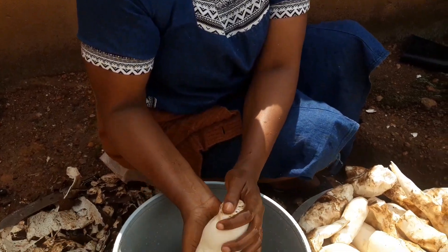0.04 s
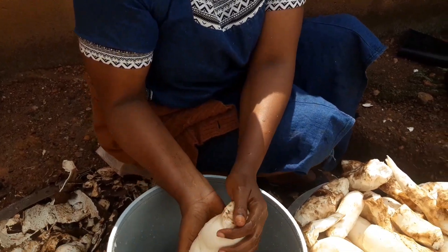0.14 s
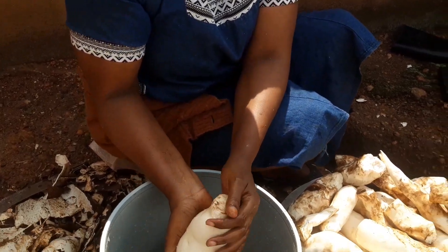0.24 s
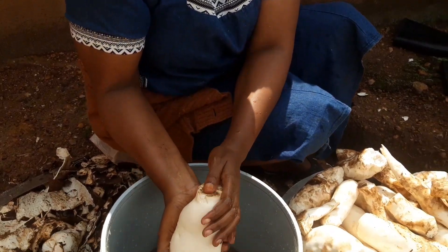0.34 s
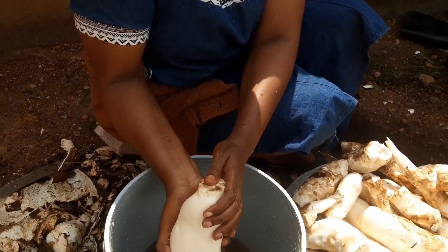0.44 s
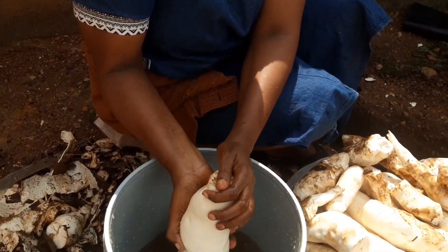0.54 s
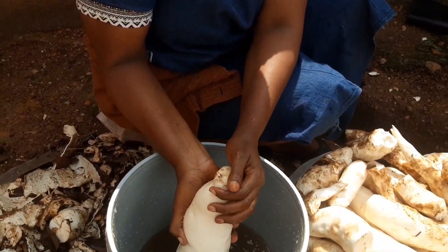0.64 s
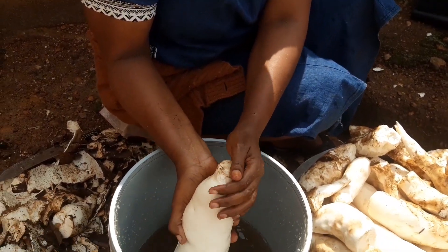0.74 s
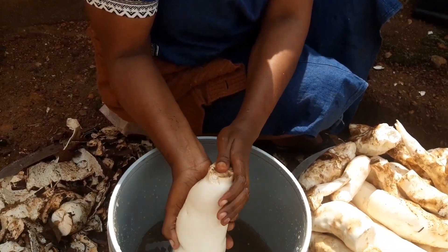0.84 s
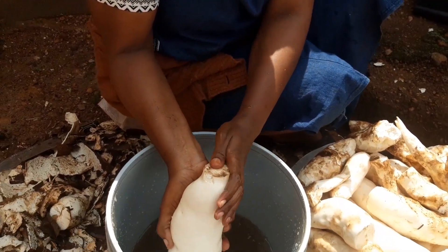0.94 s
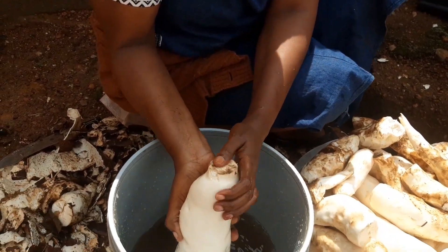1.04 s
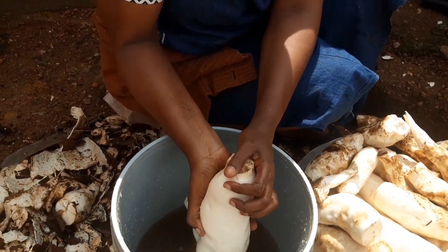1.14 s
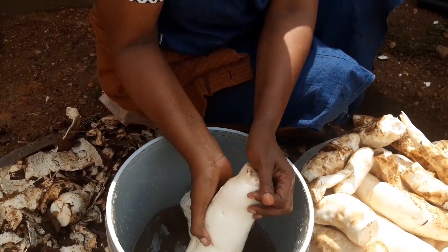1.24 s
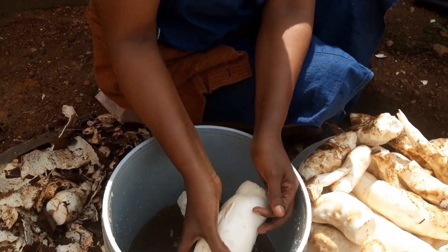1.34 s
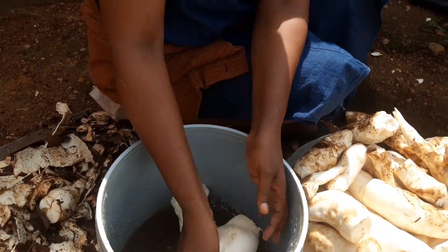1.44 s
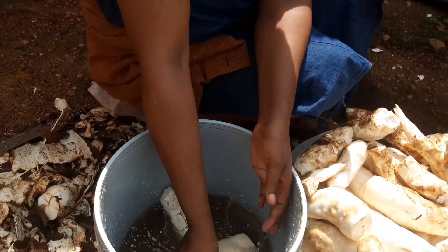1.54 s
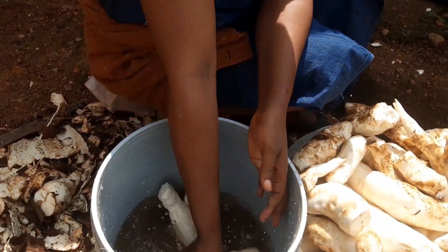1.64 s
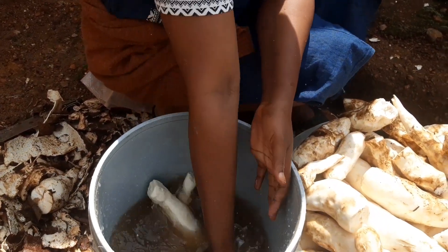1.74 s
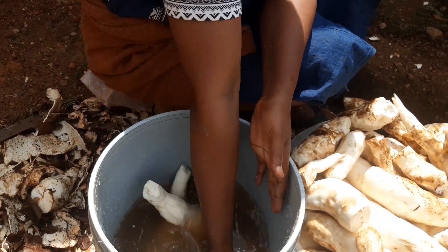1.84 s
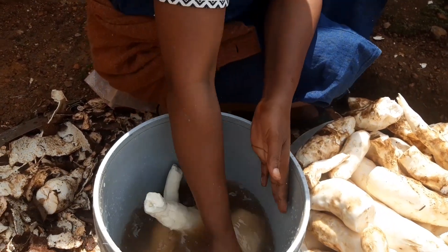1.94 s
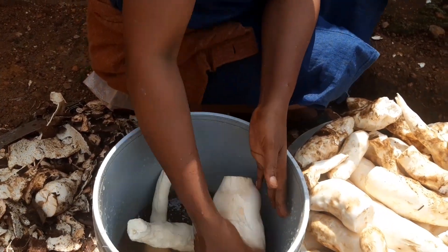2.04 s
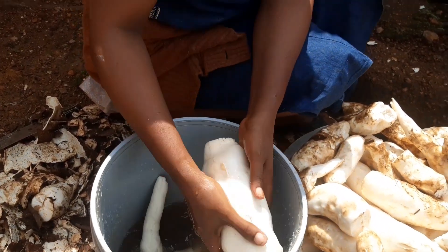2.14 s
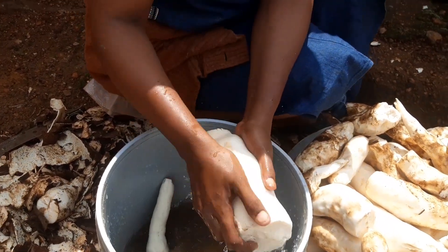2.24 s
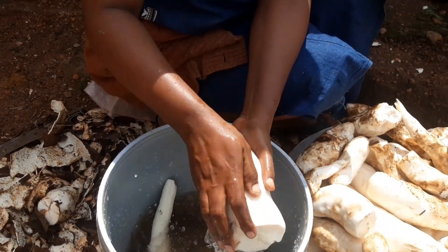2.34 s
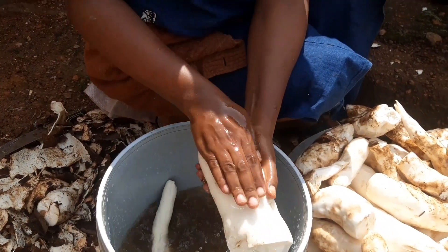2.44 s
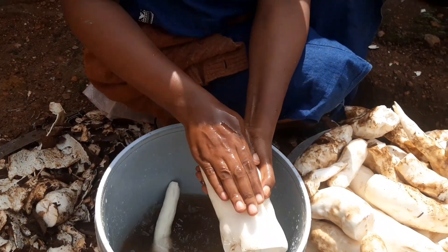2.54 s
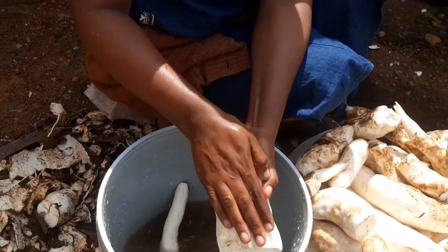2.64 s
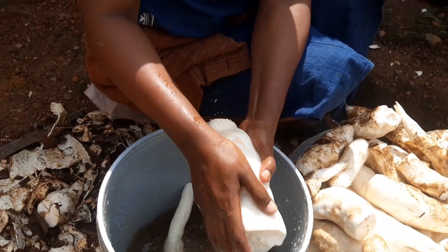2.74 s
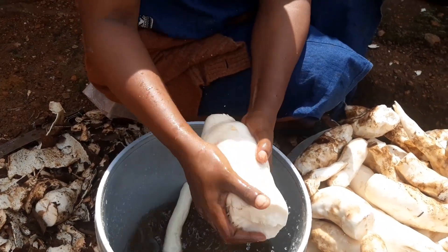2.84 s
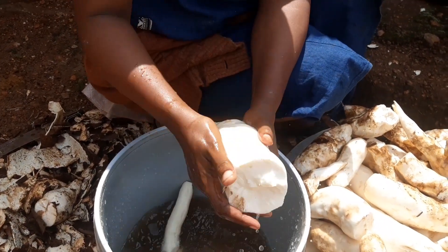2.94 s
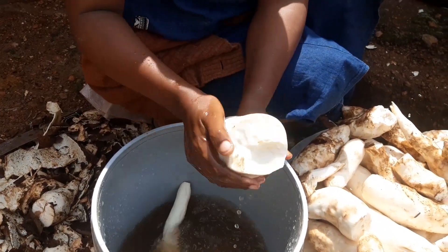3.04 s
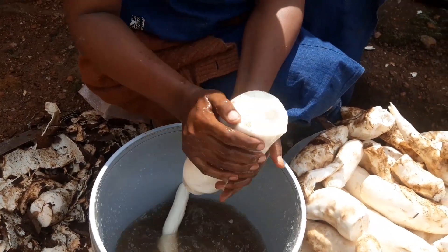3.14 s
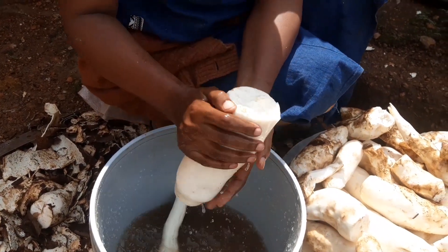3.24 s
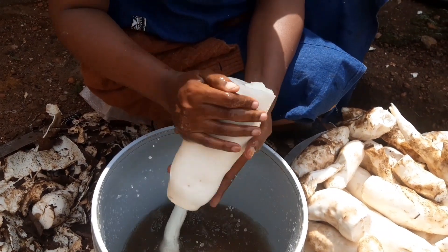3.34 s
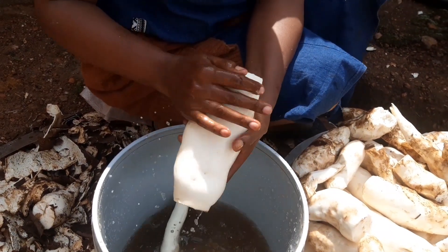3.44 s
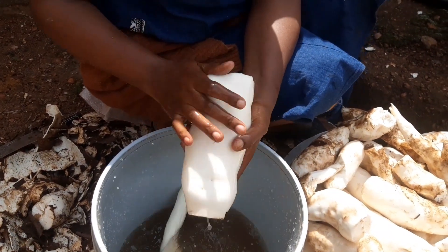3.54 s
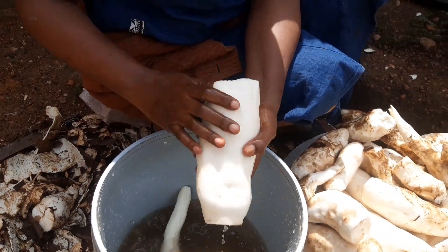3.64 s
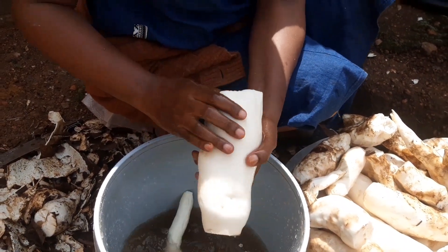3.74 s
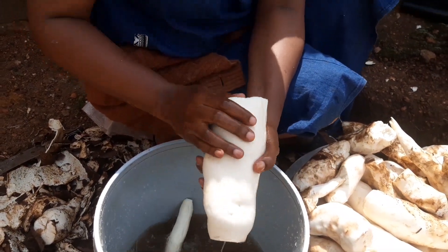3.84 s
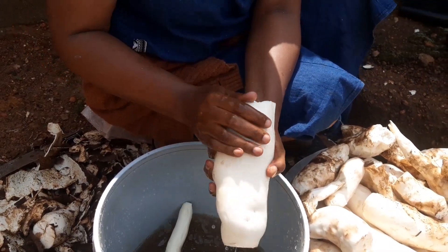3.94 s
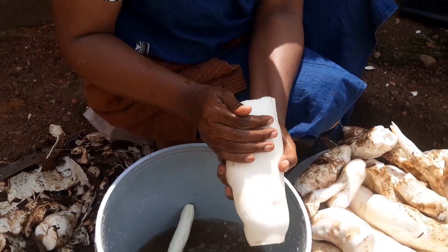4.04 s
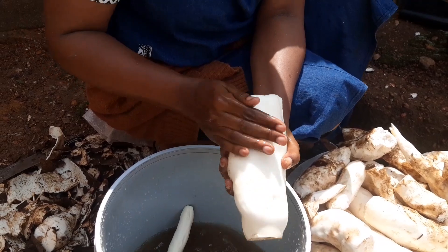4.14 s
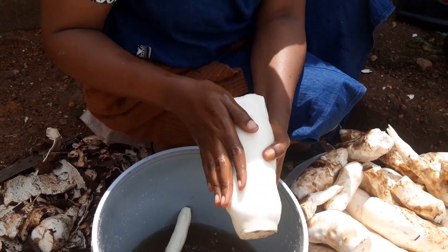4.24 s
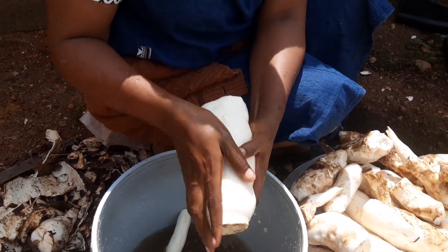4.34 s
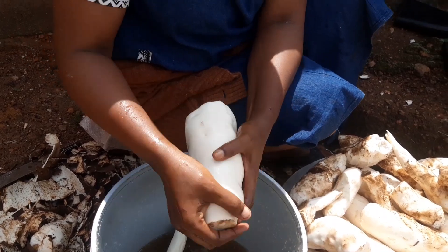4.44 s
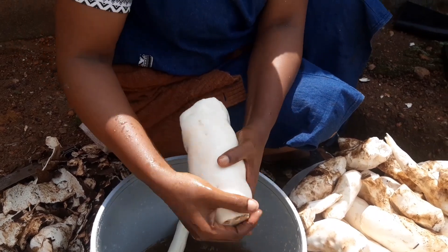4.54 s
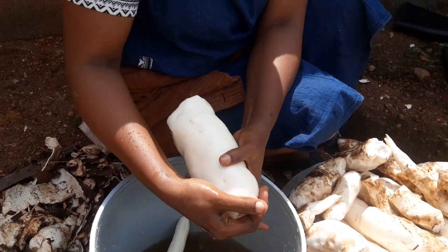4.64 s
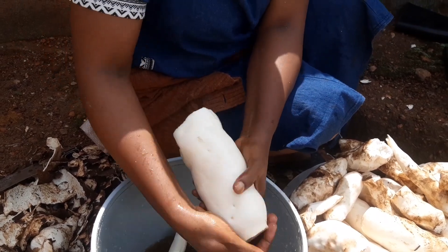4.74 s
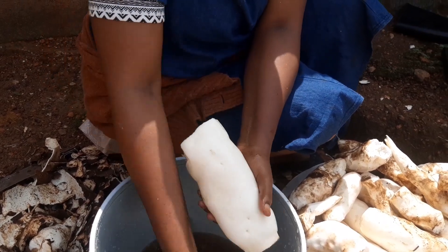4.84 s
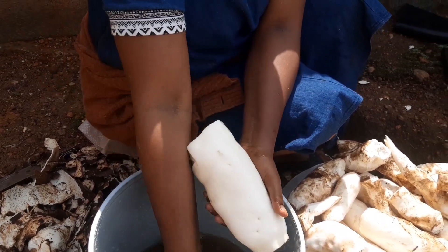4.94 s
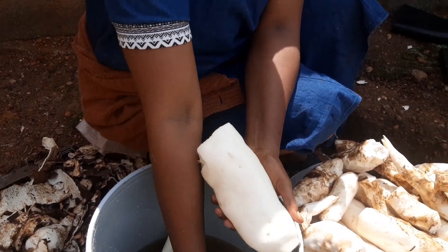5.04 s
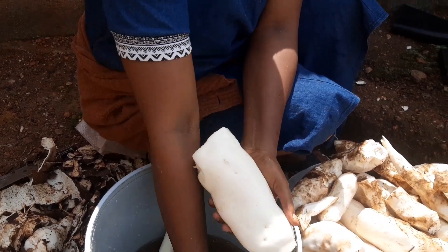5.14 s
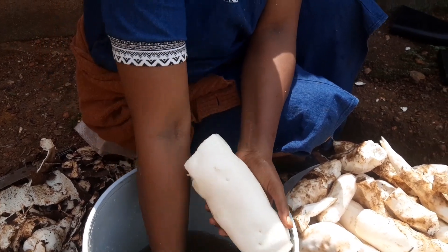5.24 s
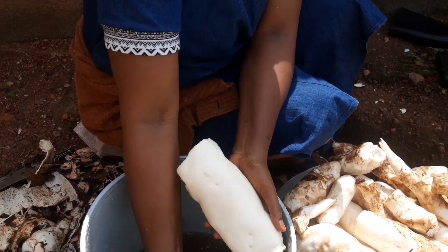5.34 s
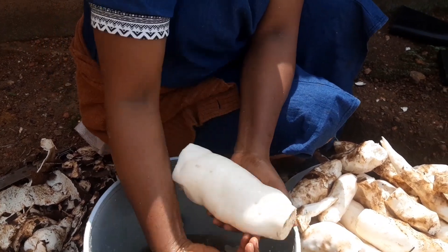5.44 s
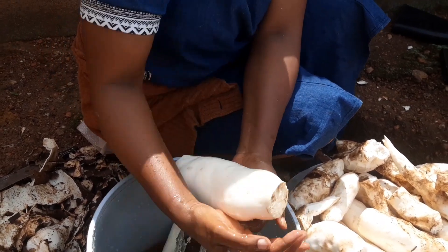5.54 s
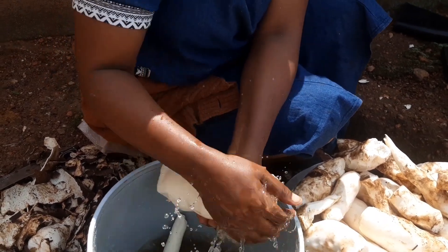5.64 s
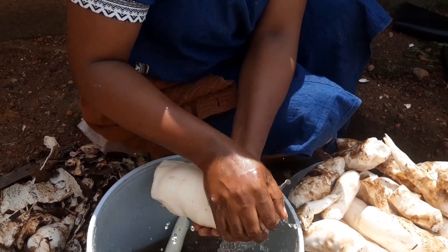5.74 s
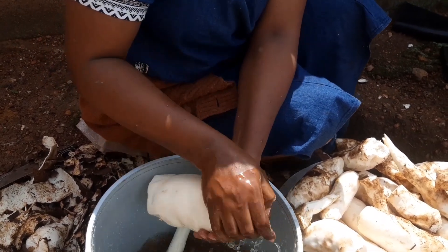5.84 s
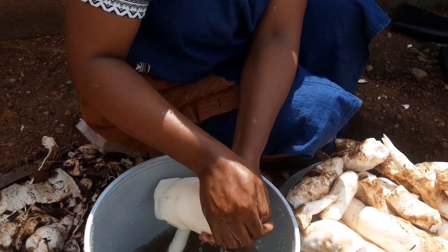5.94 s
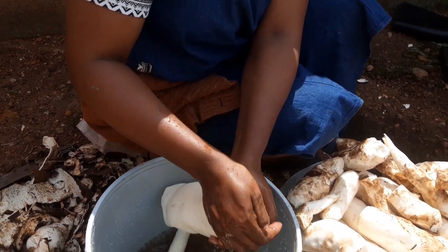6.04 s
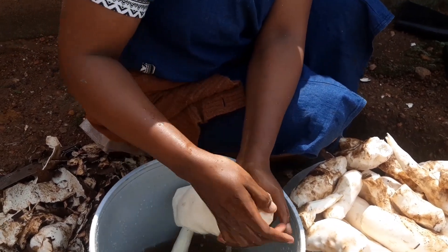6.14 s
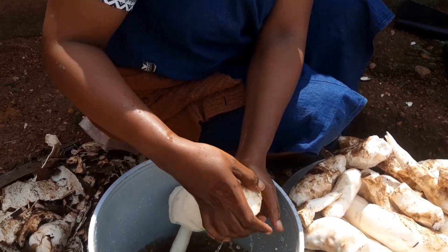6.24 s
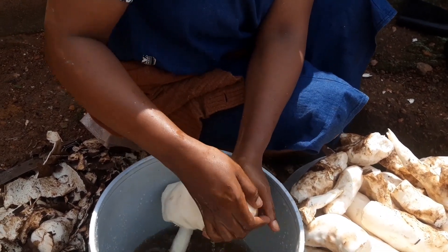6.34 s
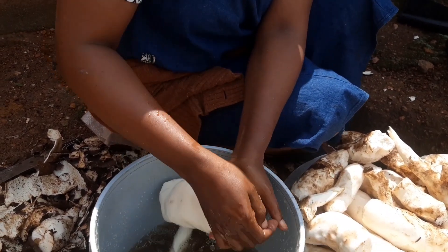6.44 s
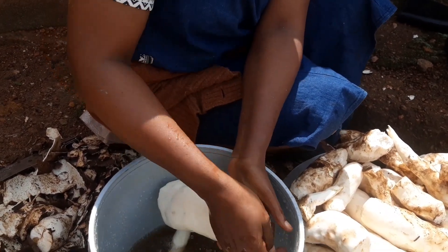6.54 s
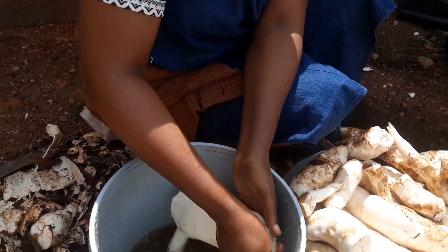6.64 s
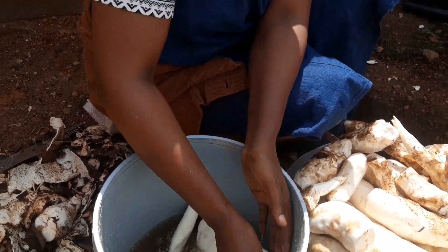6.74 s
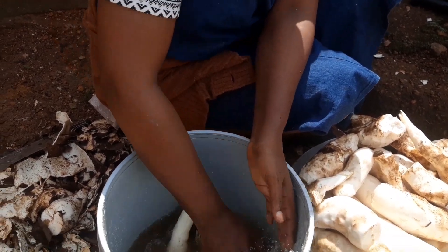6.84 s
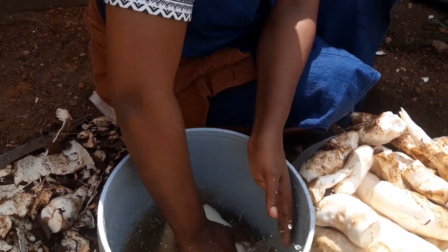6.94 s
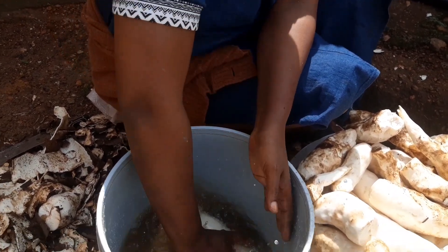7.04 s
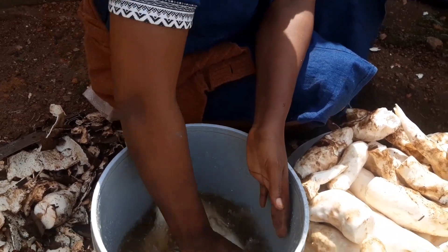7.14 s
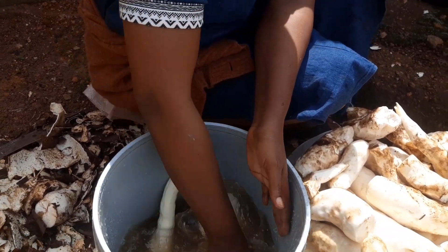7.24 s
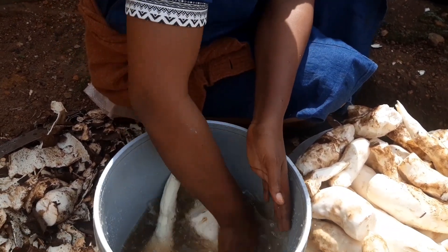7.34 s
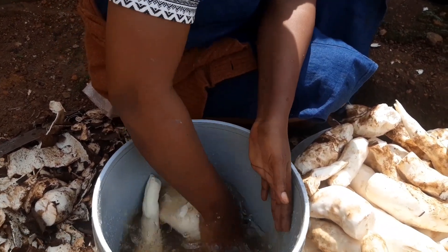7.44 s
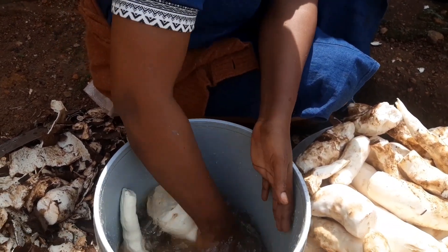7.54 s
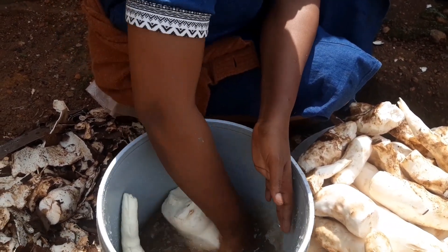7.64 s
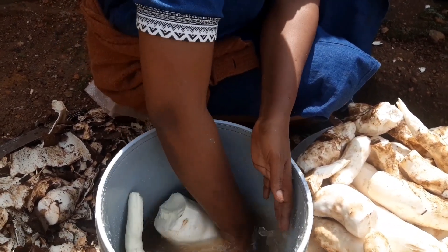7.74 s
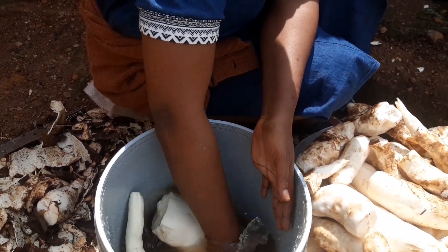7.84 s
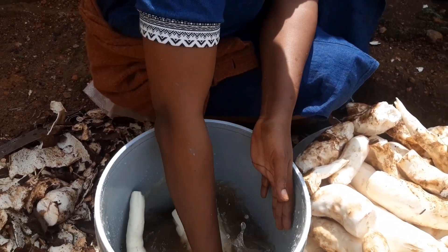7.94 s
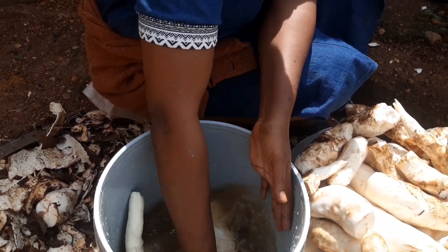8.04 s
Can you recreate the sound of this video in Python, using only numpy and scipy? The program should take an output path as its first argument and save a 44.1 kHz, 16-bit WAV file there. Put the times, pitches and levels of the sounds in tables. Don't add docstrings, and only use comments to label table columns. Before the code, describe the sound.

Close, dry stereo in a quiet yard, the right side crisp and the left duller. Hands wash peeled roots in a plastic bucket. For the first 1.3 seconds there is little water: faint drips, a dull low knock near 0.4, soft hollow rubbing and small dry clicks around 0.9. At 1.4-1.5 a sharp splash opens the dunking; rounded gurgles and plops swell around 2.0-2.3, with bright drops until 2.8. From 3 to 4.8 it is nearly still, with rubbing, sparse ticks and a faint wet squeak around 4.0-4.4. Water stirs again at about 4.9, and scooped splashes, bubbles and spray crowd 5.3-6.0. After a short lull, the strongest plunge hits at 6.8 with a hollow bucket thump. Busy sloshing follows, surging around 7.4-7.6 with deeper bucket hum, and another surge ends it near 8.

```python
import sys
import numpy as np
from scipy import signal
from scipy.fft import rfft, irfft, next_fast_len
from scipy.io import wavfile

SR = 44100
rng = np.random.default_rng(int(sys.argv[2]) if len(sys.argv) > 2 else 0)


def file_out(sig):
    cols = np.atleast_2d(sig).T
    lim = np.clip(cols, -1, 1)
    pcm = np.round(lim * 32767).astype(np.int16)
    wavfile.write(sys.argv[1], SR, pcm)


def magnitude_from_level(level_db):
    exponent = np.asarray(level_db, float) / 20
    return 10 ** exponent


N = 356769

# (peak time [s], slosh level [dB], flung water level [dB], fade by 10 dB [s])
SURGES = [(0.0, -62.5, -101, 0.11), (0.125, -66, -60, 0.045), (0.4, -59, -67.5, 0.23),
          (0.91, -58, -72, 0.076), (1.15, -62.5, -71.5, 0.64), (1.43, -43.5, -60, 0.13),
          (1.51, -41, -53.5, 0.1), (1.66, -73, -50, 0.056), (1.81, -45, -65.5, 0.078),
          (2.09, -38, -49.5, 0.18), (2.24, -43.5, -46, 0.05), (2.47, -50.5, -51.5, 0.13),
          (2.65, -50.5, -56, 0.15), (2.99, -75, -67.5, 0.24), (3.3, -71, -73, 0.95),
          (3.91, -71.5, -70, 0.12), (4.2, -70, -99, 0.67), (4.59, -84.5, -66, 0.17),
          (4.93, -52.5, -61.5, 0.089), (5.33, -42.5, -56, 0.24), (5.58, -43.5, -44, 0.16),
          (5.78, -45.5, -46, 0.17), (5.98, -52, -48.5, 0.062), (6.32, -61, -63, 0.079),
          (6.5, -74, -69.5, 0.48), (6.83, -33.5, -41, 0.098), (7.05, -52.5, -59, 0.55),
          (7.38, -41.5, -52.5, 0.25), (7.6, -37, -47.5, 0.14), (8.08, -44.5, -51.5, 0.4)]
# (time [s], peak level [dB], pitch
# [Hz], length [s])
BUBBLES = [(1.419, -37, 757, 0.035), (1.489, -33.5, 634, .0076), (2.041, -22, 1060, 0.016),
           (2.079, -20, 865, 0.0085), (2.098, -21.5, 590, 0.0064), (2.113, -26.5, 592, 0.027),
           (2.178, -22.5, 816, 0.0054), (2.197, -24.5, 930, .0076), (2.262, -29, 1050, 0.0062),
           (2.663, -37.5, 1510, 0.012), (5.298, -26, 1060, 0.0031), (5.325, -31, 829, 0.068),
           (5.374, -31, 972, .02), (5.43, -29, 787, 0.01), (5.4762, -20.5, 990, 0.011),
           (5.551, -22, 1266, 0.002), (5.601, -22, 1230, .0015), (5.802, -38, 880, 0.0033),
           (5.924, -28, 812, 0.027), (6.008, -27.5, 630, .0056), (6.827, -21, 1420, 0.0039),
           (6.8285, -14.5, 946, 0.002), (6.844, -18, 617, 0.025), (7.049, -22, 788, 0.00245),
           (7.307, -28, 1200, .0038), (7.39, -27.5, 870, 0.0028), (7.426, -28.5, 1006, 0.0037),
           (7.535, -16, 965, 0.0048), (8.089, -17, 725, 0.00134), (8.0228, -16, 1085, 0.0026),
           (0.01, -50, 666, 0.081), (0.704, -41, 654, 0.0024), (0.936, -40.5, 603, 0.0049),
         (1.374, -32, 1030, 0.0034), (1.594, -33.5, 697, 0.013), (1.759, -37, 777, 0.0094),
         (1.792, -36, 1127, 0.033), (1.812, -39, 1213, 0.029), (2.024, -31, 725, 0.016),
         (2.296, -30, 1080, 0.0063), (2.445, -42, 918, 0.052), (2.729, -38.5, 1255, .017),
         (2.739, -34, 727, 0.0072), (3.93, -41, 993, 0.025), (4.046, -48, 900, 0.0067),
         (4.124, -62, 1400, 0.012), (7.734, -33, 452, 0.035), (5.615, -31.5, 773, 0.042),
         (5.918, -29.5, 503, 0.03), (6.294, -32, 774, 0.0266), (6.337, -36.5, 1000, 0.0084),
         (6.594, -38, 900, 0.012), (6.758, -32.5, 1110, 0.0057), (7.076, -30, 690, 0.0022),
         (7.221, -28.5, 780, 0.01), (7.503, -26, 408, 0.055), (7.847, -29, 1070, 0.0038),
         (1.956, -45.5, 778, 0.025), (7.996, -27, 696, 0.014)]
# (frequency [Hz], gain [dB])
BUBBLE_AIR = [(430, 2), (570, 1), (770, 2.5), (900, -0.5), (1120, 1), (1400, 0.5), (1750, 5)]
# (time [s], peak level [dB], pitch [Hz])
PLOPS = [(1.578, -42.5, 714), (1.627, -41, 736), (1.826, -33, 1400), (1.838, -38, 1580), (1.852, -33, 1160),
         (2.03, -28, 1350), (2.058, -26, 1400), (2.07, -26, 1200), (2.007, -30.5, 760), (2.248, -38, 707),
         (2.331, -38, 686), (2.37, -42, 764), (2.426, -40, 678), (2.461, -30, 774), (2.4415, -31, 1050),
         (2.492, -34, 1000), (2.637, -34, 970), (2.701, -37, 1260), (5.114, -43, 778), (5.31, -31, 800),
         (5.198, -40, 840), (5.225, -37, 760), (5.27, -34, 1100), (5.533, -31, 1360), (5.58, -34, 1026),
         (5.659, -26, 687), (5.724, -31, 851), (5.789, -30, 970), (5.833, -27, 788), (5.862, -28.5, 1040),
         (5.892, -34, 530), (5.935, -20.5, 802), (6.605, -36, 1010), (6.229, -52, 1100),
         (6.745, -29.5, 1104), (6.784, -29, 950), (6.897, -28, 728), (6.933, -31, 703), (6.974, -38, 730),
         (7.014, -30.5, 874), (7.038, -26, 784), (7.136, -36, 787), (7.164, -37, 890), (7.247, -40, 875),
         (7.29, -31, 1300), (7.361, -42, 780), (7.45, -18.5, 823), (7.606, -28, 800), (7.634, -26, 1250),
         (7.76, -31, 470), (7.798, -38, 735), (7.82, -30.5, 732), (7.944, -34.5, 500), (7.951, -34.5, 1300),
         (7.987, -35, 785)]
# (time [s], peak level [dB], pitch [Hz])
DROPS = [(0.122, -51, 2050), (2.572, -46.5, 2800), (1.358, -49, 2350), (1.485, -27.5, 2770),
         (1.6, -38, 2780), (6.33, -46.5, 2650), (2.011, -38.5, 2870), (2.442, -39.5, 2730),
         (2.609, -42, 2380), (3.08, -56, 2330), (3.165, -53, 2530), (7.289, -36, 4350), (7.229, -42, 4100),
         (4.305, -64, 2800), (4.66, -53.5, 2470), (7.245, -42, 1610), (7.318, -42.5, 3180),
         (2.585, -45, 2300), (2.635, -49, 2820), (1.625, -46, 2900), (1.675, -42, 2260), (5.2, -53, 4250),
         (5.235, -50.5, 3600), (4.94, -48, 2530), (5.055, -56.5, 2450), (3.278, -48, 2060),
         (3.79, -50.5, 2410), (4.008, -48, 2840), (4.547, -49, 1560), (6.213, -56, 4800),
         (6.229, -55, 4250), (6.33, -50, 4200), (6.512, -55, 2300), (6.597, -55, 4450), (6.078, -48, 2100),
         (5.551, -32, 2800), (5.658, -31, 2170), (5.814, -30, 3330), (5.928, -31.5, 1870),
         (6.415, -50, 2900), (6.52, -55, 3100), (6.098, -49, 2580), (6.123, -44, 2520), (6.4, -53.5, 2300),
         (6.802, -29.5, 2130), (6.83, -20.5, 2200), (5.92, -34, 1670), (6.932, -36, 2790),
         (7.039, -38.5, 2720), (7.29, -36, 3050), (7.353, -40, 3300), (7.597, -38.5, 2200),
         (8.086, -29.5, 2850)]
# (time [s], peak level [dB], pitch [Hz])
MORE_DROPS = [(1.422, -34, 2740), (1.5244, -30, 1880), (1.6606, -44, 2230), (1.8543, -36.5, 2360),
              (1.937, -47, 4450), (2.1375, -34, 2040), (2.165, -29.5, 2040), (2.426, -33.5, 2640),
              (2.4912, -45, 2030), (2.6934, -33.5, 2530), (2.7295, -35, 2730), (2.822, -43, 2220),
              (3.7524, -49, 2350), (3.886, -52, 2650), (3.9115, -55, 2380), (3.931, -48, 2240),
              (3.9744, -52, 2520), (4.4418, -52.5, 2820), (5.272, -35.5, 3100), (5.3554, -31.5, 2200),
              (5.4277, -28, 2910), (5.4826, -29, 2300), (5.534, -34, 2940), (5.596, -26, 2230),
              (5.568, -27, 2800), (5.585, -28, 2800), (5.6895, -28, 2150), (5.79, -29, 2820),
              (5.9668, -28.5, 1980), (5.994, -39.5, 2520), (6.683, -44, 2340), (6.7148, -41.5, 2420),
              (6.8977, -38, 2650), (6.91, -21.5, 1740), (6.9995, -32.5, 2160), (7.1796, -35, 2230),
              (7.202, -29, 2730), (7.425, -35, 2200), (7.446, -30.5, 2780), (7.5163, -35, 2120),
              (7.5313, -27, 2670), (7.5448, -24, 2680), (7.618, -26, 2640), (7.799, -41, 2750),
              (7.8125, -30.5, 2564), (7.867, -31.5, 3120), (7.896, -36, 2550), (7.9587, -38, 2680)]
# (frequency [Hz], gain [dB])
DROP_AIR = [(1800, 0), (2200, 5), (2450, 1.5), (2800, 6.5), (3400, -1), (4500, 2.5)]
# (time [s], peak level [dB])
SPLATS = [(0.1233, -51), (1.483, -22), (1.523, -36.5), (1.5814, -45), (1.6522, -45), (2.251, -40),
          (2.4415, -34.5), (2.49, -41), (2.568, -46), (2.963, -49), (2.975, -49), (1.345, -52), (0.1, -54),
          (0.148, -56), (4.918, -49), (5.4097, -42), (5.5747, -36.5), (5.6361, -34.5), (5.723, -40),
          (5.805, -35), (5.97, -40), (6.743, -36), (6.786, -37), (6.8285, -22), (6.91, -30), (6.932, -30.5),
          (7.0373, -34.5), (7.0762, -40), (7.228, -38.5), (7.287, -37.5), (7.352, -33), (7.4464, -37.5),
          (7.5974, -38), (7.976, -41)]
# (time [s], peak level [dB])
FLICKS = [(1.484, -19), (1.5988, -35), (2.0787, -41), (2.513, -36.5), (2.5696, -40), (2.849, -47),
          (5.457, -36), (5.5498, -43), (5.562, -33), (5.6955, -29.5), (5.9204, -32.5), (6.8937, -43),
          (7.105, -39), (7.1626, -39.5), (7.1876, -37), (7.3599, -21.5), (7.5445, -34), (7.5817, -44),
          (7.989, -30), (8.0431, -44)]
# (time [s], peak level [dB])
FLECKS = [(0.164, -50), (0.3257, -52.5), (1.0934, -57), (1.854, -51), (2.0088, -51), (3.023, -50),
          (3.12, -60), (3.59, -60), (3.642, -59), (3.789, -57), (3.277, -56), (3.8457, -53.5),
          (4.006, -51.5), (4.277, -58), (4.6105, -61), (4.659, -55), (4.735, -55), (5.178, -51),
          (5.993, -34.5), (6.095, -52), (6.121, -49), (6.187, -57), (6.2297, -51), (7.098, -46),
          (7.325, -46), (7.556, -42), (7.637, -42), (2.356, -50), (6.41, -46), (6.464, -55), (6.4945, -50),
          (6.593, -44)]
# (frequency [Hz], density [dB per Hz])
SPRAY_SPECTRUM = [(1600, 4), (2060, 8.5), (3500, -1.5), (4200, -0.5), (6320, -11), (8140, -11), (9820, -10),
                  (12600, 3.5), (14100, -7), (15600, -4.5), (16100, -29), (16500, -47.5)]
# (time [s], peak level [dB])
SNAPS = [(0.672, -46), (0.841, -46), (0.8872, -31.5), (0.8964, -43), (0.9407, -39), (1.1583, -51),
         (4.4253, -46)]
# (time [s], pitch [Hz], level [dB])
SQUEAK = [(3.93, 1050, -81), (3.99, 1200, -74), (4.045, 1270, -64), (4.07, 800, -68), (4.17, 820, -73.5),
          (4.25, 930, -61), (4.31, 1020, -63), (4.36, 1080, -74), (4.45, 1080, -78)]
# (time [s], peak level [dB], pitch [Hz], decay by 60 dB as if at 300 Hz [s],
# longer for deeper pitches)
THUDS = [(0.015, -43, 147, 0.0057), (0.38, -20, 200, 0.0084), (0.886, -37, 298, 0.017),
         (1.372, -32.5, 299.4, 0.043), (1.507, -36, 224, 0.13), (1.595, -35, 310, 0.029),
         (1.846, -45.5, 295, 0.34), (2.728, -40, 310, 0.089), (4.907, -38.5, 326, 0.065),
         (6.001, -41.5, 272, 0.086), (6.753, -39.5, 288, 0.073), (6.822, -22.5, 260.5, 0.055),
         (7.045, -29, 330, 0.095), (7.357, -33, 302, 0.043), (7.441, -27, 330, 0.057),
         (7.594, -30, 94.8, 0.24), (7.959, -45, 86, 0.081)]
# (peak time [s], wall level [dB], air level [dB], fade by 10 dB [s])
SHOVES = [(0.0, -63, -73, 0.045), (0.41, -63, -56.5, 0.15), (0.93, -73, -75, 0.55),
          (1.4, -56.5, -49, 0.075), (1.53, -51, -42.5, 0.055), (1.89, -52, -72, 0.15),
          (2.08, -60.5, -50, 0.075), (2.35, -59, -66, 0.13), (2.97, -79, -51, 0.056),
          (3.79, -84, -50.5, 0.055), (4.125, -72.5, -54, 0.032), (4.21, -65.5, -62.5, 0.048),
          (4.58, -83, -71, 0.052), (4.94, -62.5, -55, 0.11), (5.44, -74.5, -87, 0.36),
          (5.99, -80, -60, 0.057), (6.32, -98, -69, 0.076), (6.79, -59, -53, 0.04),
          (6.86, -43, -41.5, 0.11), (7.42, -55, -44, 0.18), (7.63, -43, -46.5, .2),
          (8.04, -43.5, -70, 0.22)]
# (time [s], level [dB])
RUB = [
    (0.24, -109),
    (0.32, -62.5),
    (2.5, -56.5),
    (3.88, -62.5),
    (3.98, -107),
]
# (time [s], frequency [Hz])
WALL_MODE = [
    (0, 116.8),
    (7.3, 116),
    (7.56, 91.3),
    (8.09, 102.8),
]
# (frequency [Hz], width [Hz])
AIR_MODES = [(237.4, 45), (316.7, 21.2), (272, 22)]
# (frequency [Hz], density [dB per Hz])
YARD_SPECTRUM = [(18, -54), (30, 4), (95, 16), (179, -38), (303, -41), (404, 1), (889, 11), (1540, -35),
                 (2290, -4.5), (2830, -10.5), (8300, -26.5), (12600, -14), (16000, -45.5)]
# (frequency [Hz], gain [dB])
SHADE = [(60, -3.3), (700, -2.2), (1250, 0.3), (1650, 1.5), (1950, -2), (2900, -4), (3700, -16),
         (4300, -3.5), (5700, 0), (7700, -12), (9500, 2), (12500, -5.5), (16000, 3.5)]


def add_db(*levels):
    return 10 * np.log10(sum(magnitude_from_level(db) ** 2 for db in levels))


def rms_one(x):
    return x / np.sqrt(np.mean(x ** 2) + 1e-20)


def in_time(rows):
    s, *columns = np.transpose(rows)
    return [np.interp(np.arange(N) / SR, s, c) for c in columns]


def swells(rows):
    rise_share, still_db = 0.45, -88.5
    s, *levels, fade = np.transpose(rows)[:, :, None]
    t = np.arange(0, N, 64) / SR
    since_peak = np.where(t > s, t - s, (s - t) / rise_share)
    down_db = -10 * since_peak / fade
    return [np.interp(np.arange(N) / SR, t, add_db(still_db, *(db + down_db))) for db in levels]


def slow(rate, size=8):
    r = np.exp(-2 * np.pi * rate * size / SR)
    noise = rng.standard_normal((N + SR) // size + 2)
    sparse = signal.lfilter([1], [1, -2 * r, r * r], noise)[SR // size:]
    return np.interp(np.arange(N) / size, np.arange(len(sparse)), rms_one(sparse))


def colour(x, points, size=1024):
    hz, level_db = np.transpose(points)
    grid = np.maximum(np.arange(size // 2 + 1) * SR / size, 1)
    cepstrum = irfft(np.log(magnitude_from_level(np.interp(np.log(grid), np.log(hz), level_db))))
    cepstrum[1:size // 2] *= 2
    cepstrum[size // 2 + 1:] = 0
    return signal.fftconvolve(x, irfft(np.exp(rfft(cepstrum))))[:N]


def rings(s, level_db, hz, t60, rise, attack_s, size=4096):
    t = np.arange(size) / SR
    settings = (s, level_db, hz, t60, rise, attack_s)
    s, level_db, hz, t60, rise, attack_s = (np.reshape(v, (-1, 1)) for v in settings)
    t60 = np.clip(t60, .003, .6)
    glide = 2 ** (rise * np.minimum(t / t60 * 5, 1.4))
    phase = 2 * np.pi / SR * np.cumsum(hz * glide, axis=1)
    envelope = magnitude_from_level(level_db - 60 * t / t60) * (1 - np.exp(-t / attack_s))
    tones = envelope * np.sin(phase)
    at = (s * SR).astype(int) + np.arange(size)
    return np.bincount(at.ravel(), tones.ravel(), N + size)[:N]


def swarm(count, low_hz, high_hz, cycles, spread_db, size):
    s, pitch, big, life, rise = rng.random((count, 5)).T
    hz = low_hz * (high_hz / low_hz) ** pitch
    level_db = -spread_db * np.log(np.maximum(big, .12))
    t60 = cycles * (.5 + life) / hz
    return rms_one(rings(s * N / SR, level_db, hz, t60, 0.193 * rise, 0.13 / hz, size=size))


def puffs(s, level_db, t60, low_hz, high_hz):
    envelope, t = np.zeros(N + 4096), np.arange(4096) / SR
    lives = np.clip(t60, .004, .15) + 0 * s
    for start, gain, life in zip((s * SR).astype(int), magnitude_from_level(level_db), lives):
        envelope[start:start + 4096] += gain * magnitude_from_level(-60 * t / life) * (1 - np.exp(-t / life * 18))
    band = signal.butter(2, [low_hz, high_hz], "band", fs=SR, output="sos")
    return signal.sosfilt(band, envelope[:N] * rng.standard_normal(N) + 1e-18)


def wash(order, low_hz, high_hz):
    band = signal.butter(order, [low_hz, high_hz], "band", fs=SR, output="sos")
    return rms_one(signal.sosfilt(band, rng.standard_normal(N)))


def hum(level_db, hz, width_hz, rough_db):
    phase = 2 * np.pi * np.cumsum(hz) / SR
    band = slow(width_hz) * np.cos(phase) + slow(width_hz) * np.sin(phase)
    return magnitude_from_level(level_db + rough_db * slow(10.7)) * band


def gurgle(slosh_db):
    busy = np.clip((slosh_db + 76) / 20, .3, 1)
    small = swarm(count=2000, low_hz=640, high_hz=1480, cycles=46.0, spread_db=2.0, size=1536)
    bed = busy * small + .25 * wash(4, 480, 1270)
    bed_gain = magnitude_from_level(slosh_db - 1.8 + 2.5 * slow(14.0))

    s, peak_db, hz, length = np.transpose(np.array(BUBBLES))
    born = s - .0015
    rise = np.minimum(0.03 + 2.5 * length, 0.11)
    large = rings(born, peak_db + 3.0, hz, 4.17 * length + 0.0094, rise, 0.00014 + 0.18 * length, size=8192)
    apart, late = rng.random((len(s), 2)).T
    twin_hz = hz * (1.1 + .25 * apart)
    large += rings(s + late * length, peak_db - 11, twin_hz, 1.2 * length + .016, .1, .00086, size=2048)
    large *= 1 + .25 * slow(90.0)
    slap = puffs(born, peak_db + 3.0, 1.1 * length + 0.045, 500.0, 1250.0)
    return bed_gain * colour(bed, BUBBLE_AIR) + large + slap


def plops():
    s, peak_db, hz = np.transpose(PLOPS)
    tones = rings(s - .001, peak_db - 2, hz, 44 / hz, .07, .0012, size=2048)
    return tones * (1 + .5 * slow(120.0))


def patter(flung_db):
    busy = np.clip((flung_db + 78) / 20, .3, 1)
    grains = swarm(count=2800, low_hz=1950, high_hz=3700, cycles=70.0, spread_db=1.6, size=768)
    grains *= 1 + .35 * slow(150.0)
    bed = busy * grains + .2 * wash(3, 2000, 4200)
    bed_gain = magnitude_from_level(flung_db - 6.5 + 2.5 * slow(18.0))

    more_drops = np.array(MORE_DROPS) + [0, -10, 0]
    s, peak_db, hz = np.transpose(np.vstack([DROPS, more_drops]))
    clear = rings(s - .001, peak_db + 4, hz, .02, .04, .0008, size=1536)
    tick = puffs(s - .001, peak_db + 2.5, 0.04, 2200.0, 4200.0)
    return bed_gain * colour(bed, DROP_AIR) + clear + tick


def spray(flung_db):
    level_db = -58 + 0.91 * (flung_db + 53.0)
    busy = np.clip((level_db + 78) / 15, .3, 1)
    struck = rng.random(N) < 70 * busy / SR
    ticks = struck * magnitude_from_level(4.0 * np.minimum(rng.exponential(1, N), 2))
    flicker = 1 + 0.74 * signal.lfilter([1], [1, -np.exp(-1 / (0.0017 * SR))], ticks)
    hiss = magnitude_from_level(level_db + 3.0 + 2.2 * slow(14.0)) * flicker * rng.standard_normal(N)

    s, peak_db = np.transpose(SPLATS)
    mist = puffs(s, peak_db - 0.5, 0.07, 1600.0, 10800.0)
    flicks = np.array(FLICKS) + [0, -7]
    s, peak_db = np.transpose(np.vstack([SPLATS, flicks]))
    crack = puffs(s, peak_db + 7.5, 0.017, 3800.0, 16500.0)
    s, peak_db = np.transpose(FLECKS)
    flecks = puffs(s, peak_db + 5.0, 0.02, 5100.0, 19000.0)
    return colour(hiss + crack + mist + flecks, SPRAY_SPECTRUM)


def bucket(slosh_db):
    wall_db, upper_db = swells(SHOVES)
    upper_db = add_db(upper_db, *in_time(RUB))
    lowest_db = (wall_db + upper_db) / 2 - 0.5
    middle_db = slosh_db - 18
    wall = hum(wall_db + 6.0, in_time(WALL_MODE)[0], 22.0, 3.5)
    air = np.zeros(N)
    for db, (hz, width_hz) in zip((lowest_db, upper_db, middle_db), AIR_MODES):
        air += hum(db + 4.5, np.full(N, hz), width_hz, 1.8)

    s, peak_db, hz, t60 = np.transpose(THUDS)
    s = s + 0.00638
    thuds = rings(s, peak_db + 8.5, hz, t60 * 300 / hz, 0, 0.0011, size=16384)
    wall_hz = np.interp(s, *np.transpose(WALL_MODE))
    thuds += rings(s, peak_db - 10.5, wall_hz, 0.064, 0, 0.0016, size=8192)
    return wall + air + thuds


def snaps():
    s, peak_db = np.transpose(SNAPS)
    return puffs(s - .0005, peak_db + 6.5, 0.0056, 480.0, 2670.0)


def squeak():
    hz, level_db = in_time(SQUEAK)
    return hum(level_db, hz, 75.0, 1.5)


def yard():
    air = rms_one(colour(rng.standard_normal(N), YARD_SPECTRUM, size=4096))
    return magnitude_from_level(-71 + 2.0 * slow(0.95)) * air


def wall_echo(x):
    echo = np.zeros(200)
    echo[[0, 143]] = 1, -magnitude_from_level(-28.5)
    return signal.fftconvolve(x, echo)[:N]


def wander(x, radians):
    analytic = signal.hilbert(x, next_fast_len(N))[:N]
    return np.real(analytic * np.exp(1j * radians * slow(45.0)))


def ports(x):
    alike = signal.butter(2, 2100, fs=SR, output="sos")
    low = signal.sosfiltfilt(alike, x)
    turned = wander(low, .3) + wander(x - low, 1.7)
    turn_hz, turn_width_hz = 2000, 400
    r = np.exp(-np.pi * turn_width_hz / SR)
    poles = [1, -2 * r * np.cos(2 * np.pi * turn_hz / SR), r * r]
    left = colour(signal.lfilter(poles[::-1], poles, turned), SHADE)
    late = np.pad(x, (2, 0))
    right = colour(late, [(1050, 0), (1550, 0), (2050, 8.4)])
    return np.array([left, right])


def scene():
    slosh_db, flung_db = swells(SURGES)
    water = gurgle(slosh_db) + patter(flung_db) + spray(flung_db) + snaps()
    return ports(wall_echo(water) + plops() + bucket(slosh_db) + squeak() + yard())


def roll_off(x):
    return signal.sosfilt(signal.butter(12, 16860, fs=SR, output="sos"), x)


def record(dry):
    dry = signal.sosfilt(signal.butter(2, 90, "high", fs=SR, output="sos"), dry)
    dry = signal.sosfilt(signal.cheby2(8, 40, 16900, fs=SR, output="sos"), dry)
    return roll_off(dry)


dry = scene()
out = record(dry)
file_out(out)
```